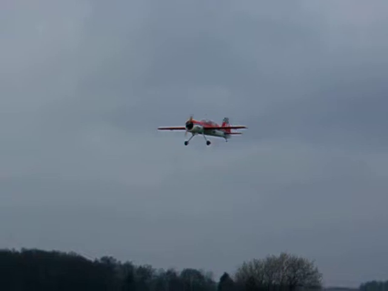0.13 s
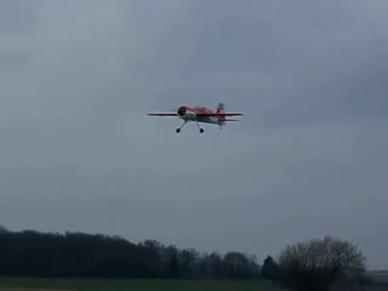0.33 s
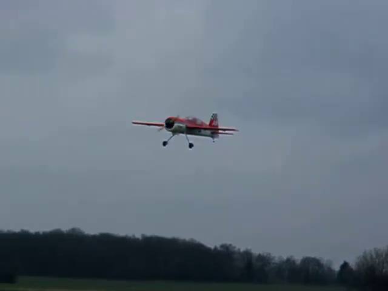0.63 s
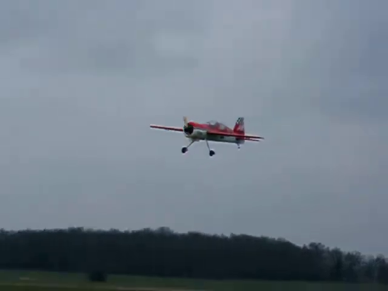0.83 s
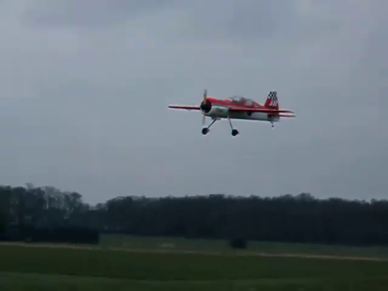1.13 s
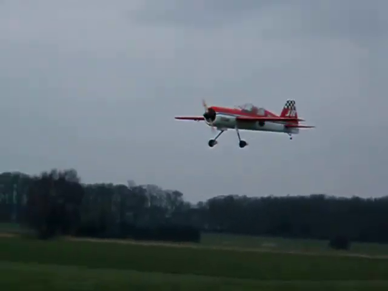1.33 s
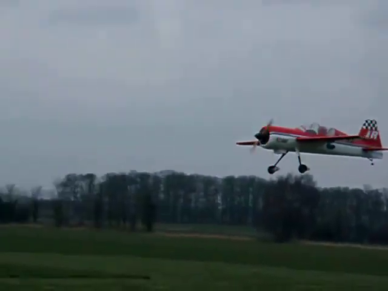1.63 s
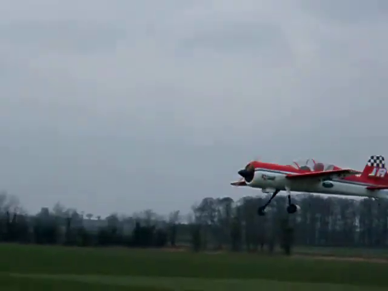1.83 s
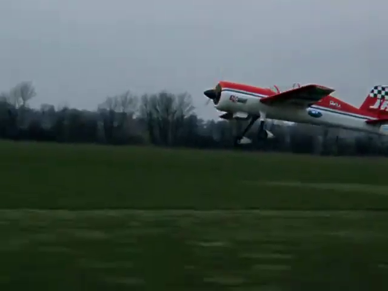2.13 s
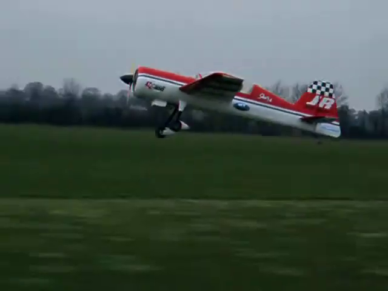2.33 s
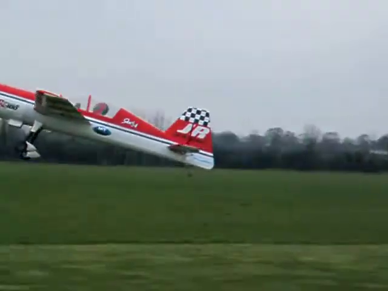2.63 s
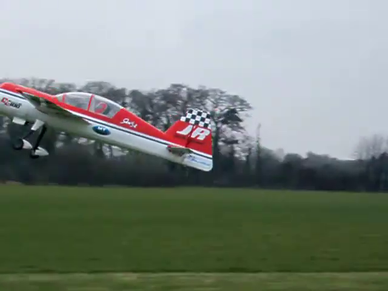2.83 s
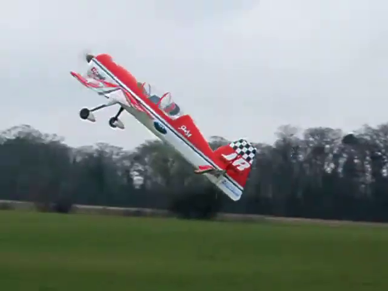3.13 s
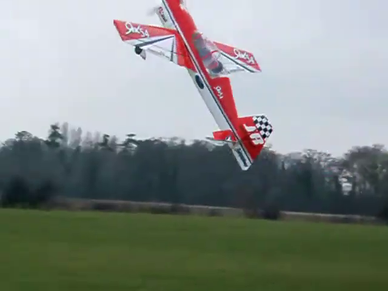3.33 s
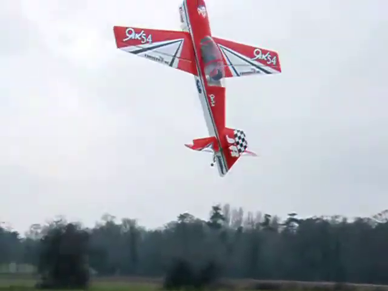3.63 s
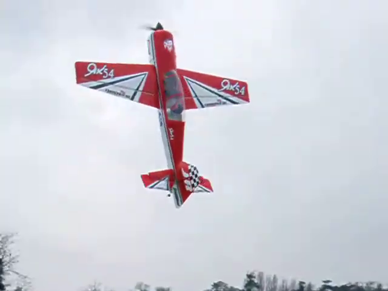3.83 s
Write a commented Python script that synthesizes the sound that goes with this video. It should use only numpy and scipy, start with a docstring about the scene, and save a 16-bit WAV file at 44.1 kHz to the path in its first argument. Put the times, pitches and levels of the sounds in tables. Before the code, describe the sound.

A small propeller plane idles past, then revs up, as wind buffets the microphone.

```python
"""A large single-cylinder model plane idles low over a grass field, passes close to the microphone
and pulls up under opening throttle. Each turn of the shaft fires one pop through the muffler, with one
sharp tick and two chops of the propeller's hiss; the ground reflection colours them as the plane sinks
and climbs. Wind rumbles on the microphone and buffets it hard during the pass.
Two handling clicks come at the start, right at the microphone."""
import sys
import numpy as np
from scipy import signal
from scipy.fft import rfft, irfft, next_fast_len
from scipy.io import wavfile
from scipy.ndimage import map_coordinates

SR = 44100
rng = np.random.default_rng(int(sys.argv[2]) if len(sys.argv) > 2 else 0)


def inscribe(sig):
    """Save sig as 16-bit PCM at rate SR to the path in sys.argv[1].

    A 1-D sig is mono; a 2-D sig holds one channel per row.
    Samples are clipped to [-1, 1] before scaling.
    """
    pcm = np.round(np.clip(np.atleast_2d(sig).T, -1, 1) * 32767)
    wavfile.write(sys.argv[1], SR, pcm.astype(np.int16))


N = 176400
TIME = np.arange(N) / SR


def amp(db):
    return 10 ** (np.asarray(db) / 20)


def unit_rms(x):
    return x / np.sqrt(np.mean(x ** 2) + 1e-20)


def noise():
    return rng.standard_normal(N)


def curves(rows):
    """One value per sample for each column after the time."""
    times, *columns = np.transpose(rows)
    return [np.interp(TIME, times, column) for column in columns]


def wobble(rate_hz):
    """A smooth random curve with rate_hz knots a second."""
    knots = rng.standard_normal(int(N * rate_hz / SR) + 4)
    return map_coordinates(knots, [TIME * rate_hz])


def filtered(x, response):
    """x through a complex response, given as a function of frequency."""
    size = next_fast_len(N + SR // 2)
    return irfft(rfft(x, size) * response(np.fft.rfftfreq(size, 1 / SR)), size)[:N]


def coloured(x, spectrum):
    """x through a causal filter shaped by (frequency [Hz], gain [dB]) points, at rms 1."""
    hz, db = np.transpose(spectrum)
    size = 4096
    f = np.fft.rfftfreq(size, 1 / SR)
    gain = amp(np.interp(np.log(f + 1), np.log(hz + 1), db))
    causal_cepstrum = 2 * irfft(np.log(gain)) * (np.arange(size) < size // 2)
    impulse = irfft(np.exp(rfft(causal_cepstrum)))
    return unit_rms(signal.fftconvolve(x, unit_rms(impulse))[:N])


def per_turn(angle, scatter_db):
    """A new random gain for every turn of the shaft."""
    gains = amp(scatter_db * rng.standard_normal(512))
    return gains[np.floor(angle).astype(int) % 512]


# Engine speed across the field: (time [s], speed [turns/s])
SHAFT_SPEED = [(0.0, 41.18), (0.4, 39.78), (0.65, 40.82), (0.9, 40.21), (1.2, 39.85), (1.45, 38.78),
               (1.75, 39.23), (1.9, 38.55), (2.08, 36.42), (2.3, 38.37), (2.45, 40.09), (2.6, 38.69),
               (2.75, 35.79), (2.9, 35.65), (3.13, 35.31), (3.19, 38.32), (3.25, 42.29), (3.36, 43.7),
               (3.5, 38.84), (3.58, 38.42), (3.66, 44.29), (3.72, 48.69), (3.87, 57.46), (4.0, 62.48)]


def shaft_angle():
    """Turns made by the shaft, which times the firings, the ticks and the blades."""
    return np.cumsum(curves(SHAFT_SPEED)[0]) / SR


def firings(angle, rough, fade_turns, jitter_s=0.00023, scatter_db=1.26):
    """One pop a turn, then a dying puff of turbulence; rough is the puffs' share of the power."""
    onsets = np.flatnonzero(np.diff(np.floor(angle)) > 0)
    jitter = np.round(jitter_s * SR * noise()[:len(onsets)]).astype(int)
    pops = np.bincount(np.clip(onsets + jitter, 0, N - 1), per_turn(angle, scatter_db)[onsets], N)
    puffs = noise() * np.exp(-(angle % 1) / fade_turns) * per_turn(angle, scatter_db)
    return np.sqrt(1 - rough) * unit_rms(pops) + np.sqrt(rough) * unit_rms(puffs)


def muffler(x, modes, band_hz=(180, 1700)):
    """The muffler's resonances, driven by x and dying out beyond band_hz, at rms 1."""
    def response(f):
        return sum(amp(db) * 1j * f * width / (hz * hz - f * f + 1j * f * width)
                   for hz, width, db in modes)
    band = signal.butter(4, band_hz, "band", fs=SR, output="sos")
    return unit_rms(signal.sosfilt(band, filtered(x, response)))


# Exhaust at the microphone, before the throttle's boost: (time [s], level [dB])
EXHAUST_LEVEL = [(0, -36.5), (.35, -38), (.8, -35), (1.5, -31.5), (2.2, -30), (2.45, -26.5), (2.7, -36.5),
                 (3.05, -32.5), (3.3, -31), (3.55, -34), (3.62, -31), (3.75, -33), (3.88, -28.5),
                 (4, -29.5)]
# Throttle, opened after the pass: (time [s], opening [0-1])
THROTTLE_OPENING = [(3.17, 0), (3.23, .4), (3.588, .3), (3.596, 1), (3.63, .9), (3.85, 1)]
# Hard firings, most as the throttle opens: (time [s], boost [dB], half-width [ms])
HARD_FIRINGS = [(1.09, 9.5, 5), (1.292, 7.5, 6.8), (2.326, 10, 3.4), (3.186, 4, 5), (3.235, 6.5, 5.7),
                (3.309, 4, 7), (3.394, 0, 5), (3.438, 5.5, 7.4), (3.541, 7.5, 3.7), (3.6, 5.5, 5.9),
                (3.685, 4, 6.5), (3.772, 3, 5.7), (3.82, 4, 7.7), (3.867, 3, 6.3)]
# Muffler colour at idle and wide open: (frequency [Hz], gain [dB])
IDLE_SPECTRUM = [(70, -37), (130, -5), (200, 2.5), (300, -2.5), (400, -3.5), (500, -1.5), (670, 0),
                 (850, -7), (1100, -9.5), (1400, -8.5), (1680, -18), (1850, -28), (2600, -53)]
OPEN_SPECTRUM = [(70, -25.5), (170, -11), (250, 2), (350, -3), (490, 0), (600, 0), (800, -3), (1100, -9),
                 (1400, -11.5), (1680, -12.5), (1850, -23.5), (2300, -21), (3300, -22), (4000, -34),
                 (6000, -36.5), (8800, -74)]
# Muffler resonances at part throttle and wide open: (frequency [Hz], width [Hz], gain [dB])
PART_MODES = [(509, 79, 8), (656, 55, -3.5), (875, 39, -7), (1410, 120, -20)]
OPEN_MODES = [(308.5, 21, 3), (486, 12.4, 7.5), (699, 11, -4), (1066, 7.4, 2), (1405, 11, -4.5)]


def exhaust(angle, fire_turn=0.45, throttle_boost_db=9.5):
    """Firings through the muffler: a putter at idle, hollow at part throttle, a hard bark wide open."""
    level_db, = curves(EXHAUST_LEVEL)
    throttle, = curves(THROTTLE_OPENING)
    cycle = angle - fire_turn
    pops = firings(cycle, rough=0.25, fade_turns=0.78)
    idle = coloured(firings(cycle, rough=0.91, fade_turns=1.83), IDLE_SPECTRUM)
    hollow = amp(-3.5) * muffler(firings(cycle, rough=0.62, fade_turns=1.0), PART_MODES)
    roar = coloured(firings(cycle, rough=0.91, fade_turns=2.7), OPEN_SPECTRUM)
    wide_open = unit_rms(roar + amp(-7) * muffler(pops, OPEN_MODES))
    voice = (1 - throttle) * idle + 4 * throttle * (1 - throttle) * hollow + throttle * wide_open
    bark_db = sum(db * np.exp(-((TIME - s) * 1000 / ms) ** 2) for s, db, ms in HARD_FIRINGS)
    sputter_db = 0.63 * wobble(29.91)  # uneven running
    return amp(level_db + throttle_boost_db * throttle + bark_db + sputter_db) * voice


# Propeller hiss at the microphone: (time [s], level [dB], chop depth [0-1])
HISS_LEVEL_AND_CHOP = [(0, -40, 0.5), (.4, -40.5, 0.25), (1.15, -35.5, 0.2), (1.8, -35.5, 0.22),
                       (2.2, -37, 0.45), (2.45, -37.5, 0.2), (2.75, -43.5, 0.57), (3, -41, 0.65),
                       (3.24, -39.5, 0.52), (3.5, -42, 0.7), (3.65, -40, 0.5), (4, -34.5, 0.6)]
# The two blades' chops: (position [turns], level [dB], width [turns])
BLADE_CHOPS = [(0.626, 0.5, 0.11), (0.135, -2, 0.096)]
# Hiss from far down the field, and from the close pass on: (frequency [Hz], gain [dB])
FAR_SPECTRUM = [(1000, -14.5), (1550, -5), (1850, -14), (2170, -5), (2300, -6), (2700, -3.5), (3300, -2),
                (3800, -6.5), (4400, -3.5), (5200, -1.5), (6000, -8), (7140, -13.5), (7740, -20.5),
                (8500, -33), (9000, -46)]
NEAR_SPECTRUM = [(1000, -25.5), (1600, -14.5), (1850, -13.5), (2250, -6), (3000, -2), (3400, -0.5),
                 (3900, -5.5), (5000, 0.5), (6200, -6), (7460, -12.5), (8500, -27), (9000, -51.5)]


def propeller(angle, abeam_s=2.61, crossfade_s=0.13):
    """Blade hiss bunches into two chops a turn and changes colour as the plane comes abeam."""
    level_db, depth = curves(HISS_LEVEL_AND_CHOP)
    chop = np.zeros(N)
    for position, db, width in BLADE_CHOPS:
        blade = angle - position + .5  # the chop peaks halfway through this turn
        pulse = np.exp(-((blade % 1 - .5) / width) ** 2 / 2)
        chop += amp(db) * per_turn(blade, scatter_db=3.07) * pulse
    envelope = np.sqrt(1 - depth + depth * unit_rms(chop) ** 2) * amp(0.76 * wobble(700))
    far = coloured(envelope * noise(), FAR_SPECTRUM)
    near = coloured(envelope * noise(), NEAR_SPECTRUM)
    near_share = .5 + .5 * np.tanh((TIME - abeam_s) / crossfade_s)
    return amp(level_db) * (np.sqrt(1 - near_share) * far + np.sqrt(near_share) * near)


# Engine tick at the microphone: (time [s], level [dB])
TICK_LEVEL = [(0, -58.5), (1.5, -46.5), (2.3, -54), (2.55, -44.5), (2.75, -53.5), (3.05, -44.5),
              (3.24, -43), (3.5, -55), (3.62, -45), (4, -48)]
# Its colour: (frequency [Hz], gain [dB])
TICK_SPECTRUM = [(900, -32.5), (2000, -10), (3300, -7.5), (5000, 1), (6800, -6.5), (8000, -19), (9000, -43)]


def ticking(angle, tick_turn=0.622, width_turns=0.04):
    """One dry, bright crack of the engine in every turn, each of its own strength."""
    level_db, = curves(TICK_LEVEL)
    pulse = np.exp(-((angle % 1 - tick_turn) / width_turns) ** 2 / 2)
    cracks = pulse * per_turn(angle, scatter_db=1.6) * noise()
    return amp(level_db) * coloured(cracks, TICK_SPECTRUM)


# Bounce off the grass, closest behind the direct sound when the plane is low: (time [s], lag [ms])
GROUND_LAG = [(0, 1.63), (.5, 1.71), (1.1, 1.67), (1.8, 1.46), (2.3, 1.25), (2.7, 1.33), (3.05, 1.73),
              (3.3, 1.97), (3.6, 2.32), (3.9, 2.75), (4, 3.1)]


def over_grass(x, reflection):
    """Direct sound and ground reflection meet at the microphone as a moving comb filter."""
    lag_ms, = curves(GROUND_LAG)
    bounce = np.interp(TIME - lag_ms / 1000, TIME, x)
    return (x + reflection * bounce) / np.sqrt(1 + reflection ** 2)


# Wind on the microphone, strongest during the pass: (time [s], level [dB])
WIND_LEVEL = [(0, -45), (.45, -47.5), (.8, -34.5), (1, -46.5), (1.16, -37.5), (1.4, -36.5), (1.75, -31),
              (2.15, -29), (2.4, -32.5), (2.47, -25), (2.65, -18), (2.79, -19.5), (2.9, -28.5),
              (3.1, -33.5), (3.35, -41), (3.55, -36.5), (4, -37.5)]
# Rumble in light and in strong flow: (frequency [Hz], gain [dB])
BREEZE_SPECTRUM = [(25, -12), (60, -11), (110, 0), (170, 1.5), (260, -4.5), (400, -9), (800, -16),
                   (2000, -58), (5000, -74.5)]
GUST_SPECTRUM = [(25, -44.5), (65, -26.5), (120, -6), (220, 0), (310, 3), (400, -5), (500, -3.5),
                 (700, -12.5), (1000, -19), (1500, -36), (2000, -41), (5000, -72)]


def wind(gust_from_db=-25.5, crossfade_db=5, flutter_hz=100.1):
    """Eddies on the microphone: the stronger the flow, the brighter and more fluttering."""
    level_db, = curves(WIND_LEVEL)
    gust_share = .5 + .5 * np.tanh((level_db - gust_from_db) / crossfade_db)
    breeze = coloured(noise() * amp(2.0 * wobble(45)), BREEZE_SPECTRUM)
    flutter = 1 + 0.3 * np.sin(2 * np.pi * flutter_hz * TIME + wobble(17))
    gust = coloured(noise() * flutter * amp(1.5 * wobble(200)), GUST_SPECTRUM)
    return amp(level_db) * (np.sqrt(1 - gust_share) * breeze + np.sqrt(gust_share) * gust)


def struck(start_s, modes):
    """Damped modes ringing from a strike at start_s."""
    age = np.maximum(TIME - start_s, 0)
    return (age > 0) * sum(amp(db) * np.exp(-np.log(1000) * age / t60) * np.cos(2 * np.pi * hz * age)
                           for hz, db, t60 in modes)


# Handling, at the microphone: (time [s], snap gain [dB], ring gain [dB], ring delay [s], cutoff [Hz])
HANDLING = [(0.1103, -16, -16, 0.0036, 1680), (.2325, -6.5, -26, 0.0033, 4260)]
# Plastic snap and camera case: (frequency [Hz], level [dB], 60 dB decay time [s])
SNAP_MODES = [(1050, -0.5, 0.0033), (1960, -3.5, 0.0056), (3020, -2.5, 0.0038), (3840, -13, 0.0045),
              (5800, -3.5, 0.007)]
CASE_MODES = [(950, 4, 0.022), (774, -14, 0.07), (388, -6, 0.038)]


def handling_clicks():
    """A dry plastic snap, then a short ring of the camera case."""
    clicks = np.zeros(N)
    for s, snap_db, ring_db, delay_s, cutoff_hz in HANDLING:
        snap = amp(snap_db) * struck(s, SNAP_MODES)
        ring = amp(ring_db) * struck(s + delay_s, CASE_MODES)
        band = signal.butter(2, [380, cutoff_hz], "band", fs=SR, output="sos")
        clicks += signal.sosfilt(band, snap + ring)
    return clicks


# Slaps of air straight on the microphone: (time [s], peak [dB], half-width [ms])
AIR_SLAPS = [(.840, -22.5, 1.44), (1.123, -20, 1.16), (1.15, -18, 1), (1.236, -18.5, 1.5), (1.308, -25, 2),
             (1.547, -17.5, 1.04), (1.651, -21, 1.3), (1.94, -16, 0.98), (1.958, -24, 1.6),
             (1.986, -15.5, 1.3), (2.042, -17, 1), (2.121, -14, 1.3), (2.132, -10, 0.48),
             (2.144, -11.5, 0.96), (2.16, -16.5, 1), (2.236, -14, 1), (2.311, -26, 1.3), (2.337, -21, 1.3),
             (2.47, -9, 1.35), (2.506, -8.5, 0.75), (2.538, -12, 0.95), (2.546, -7, 0.61),
             (2.556, -8.5, 0.96), (2.567, -10.5, .55), (2.58, -14, .85), (2.591, -8, 0.41),
             (2.604, -7.5, 1.25), (2.614, -0.5, 0.66), (2.622, -10, 0.56), (2.646, -12.5, 0.84),
             (2.652, -1, 0.61), (2.66, -3, 0.5), (2.681, -6, 0.52), (2.699, -10, 1.4), (2.707, -4.5, 0.37),
             (2.745, -6, 0.88), (2.751, -7.5, .4), (2.763, -8.5, 0.39), (2.778, -10, 0.81),
             (2.786, -6.5, 0.57), (2.793, -10, 0.41), (2.82, -11.5, 0.7), (2.845, -11, 0.9),
             (2.864, -3.5, 0.64), (3.036, -18, 0.89), (3.083, -14, 0.79), (3.191, -15.5, 0.8)]
# Colour of their rasp: (frequency [Hz], gain [dB])
RASP_SPECTRUM = [(200, -11.5), (700, 9), (1500, 1.5), (2200, -15.5), (3000, -24), (8000, -52.5)]


def buffets(rasp_db=-19.5, rasp_db_per_slap_db=1.7, rasp_ms=2.25):
    """Each slap is one short swing of pressure with a dip on either side; the hardest ones rasp."""
    swings, rasp = np.zeros(N), np.zeros(N)
    for s, db, half_width_ms in AIR_SLAPS:
        offset_ms = (TIME - s) * 1000
        u = offset_ms / half_width_ms
        swings += amp(db) * (1 - u * u) * np.exp(-u * u / 2)
        rasp += amp(rasp_db + rasp_db_per_slap_db * db) * np.exp(-(offset_ms / rasp_ms) ** 2)
    return swings + rasp * coloured(noise(), RASP_SPECTRUM)


def scene():
    """The plane out over the grass, with wind and handling right at one mono microphone."""
    angle = shaft_angle()
    putter = over_grass(exhaust(angle), reflection=0.4)
    hiss_and_ticks = over_grass(propeller(angle) + ticking(angle), reflection=0.031)
    return (putter + hiss_and_ticks + wind() + handling_clicks() + buffets())[None]


def record(dry, start_s=0.072, low_cut_hz=60, ceiling=0.7, top_hz=8870):
    """The microphone opens a moment late, thins the bass, rounds off peaks and cuts the top treble."""
    low_cut = signal.butter(2, low_cut_hz, "high", fs=SR, output="sos")
    thinned = signal.sosfilt(low_cut, dry[0]) * (TIME > start_s)
    rounded = thinned / (1 + np.abs(thinned / ceiling) ** 6) ** (1 / 6)
    return filtered(rounded, lambda f: np.clip((top_hz - f) / 300 + .5, 0, 1))[None]


dry = scene()
out = record(dry)
inscribe(out)
```